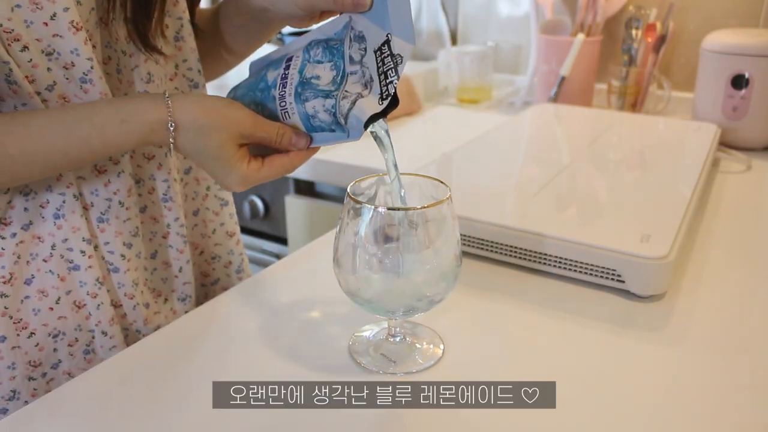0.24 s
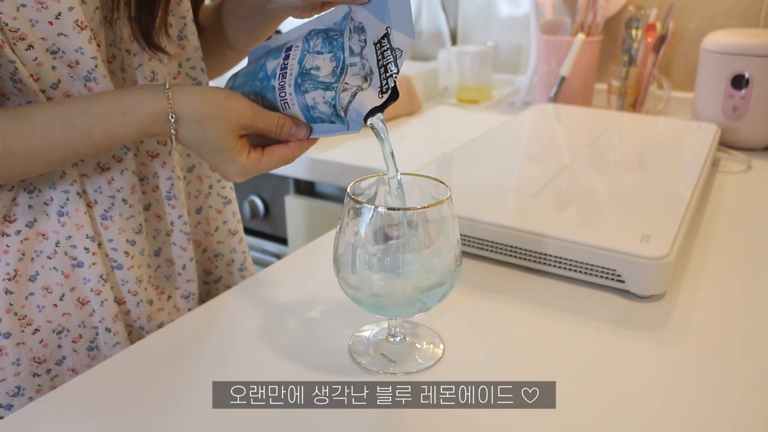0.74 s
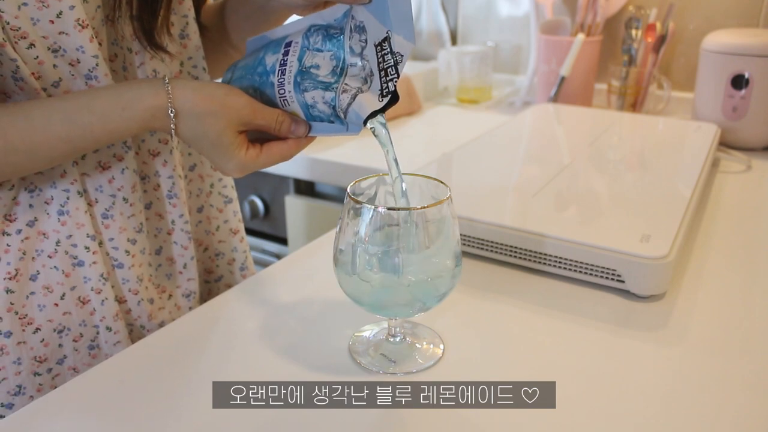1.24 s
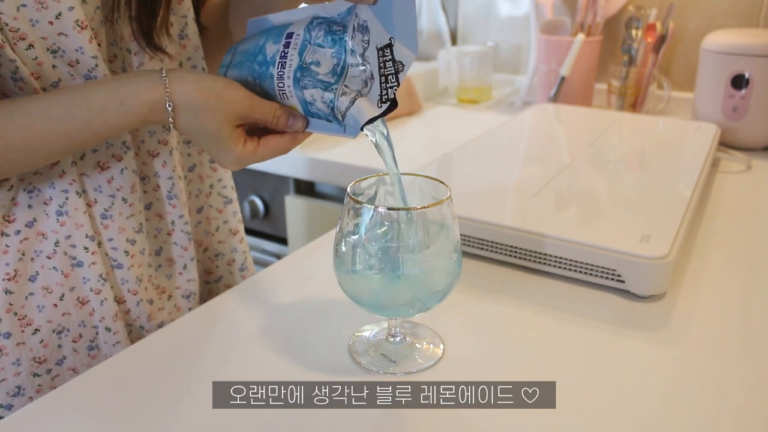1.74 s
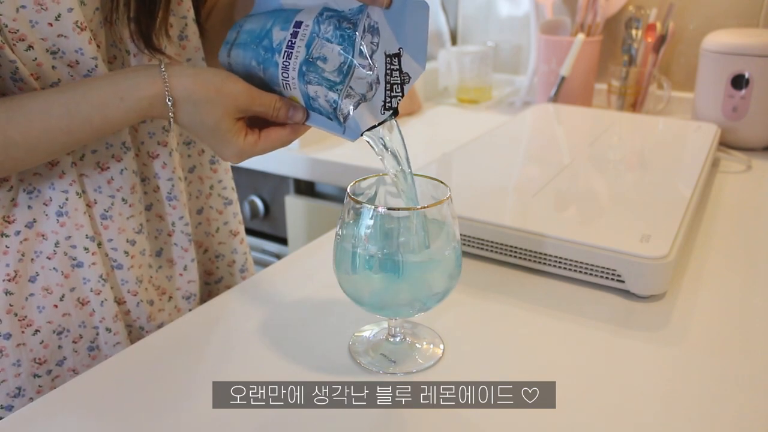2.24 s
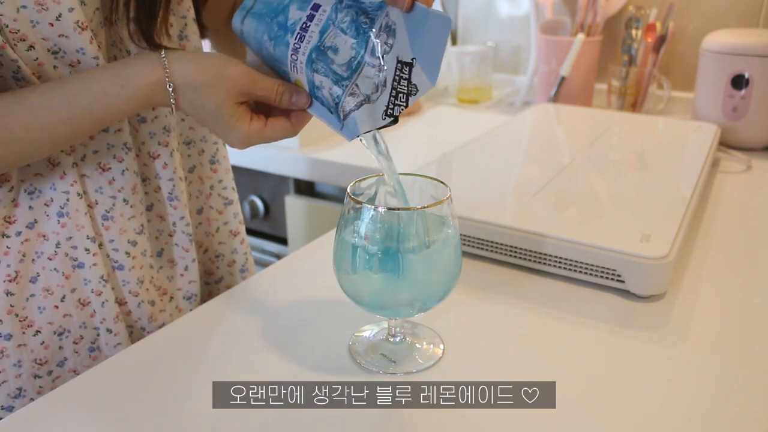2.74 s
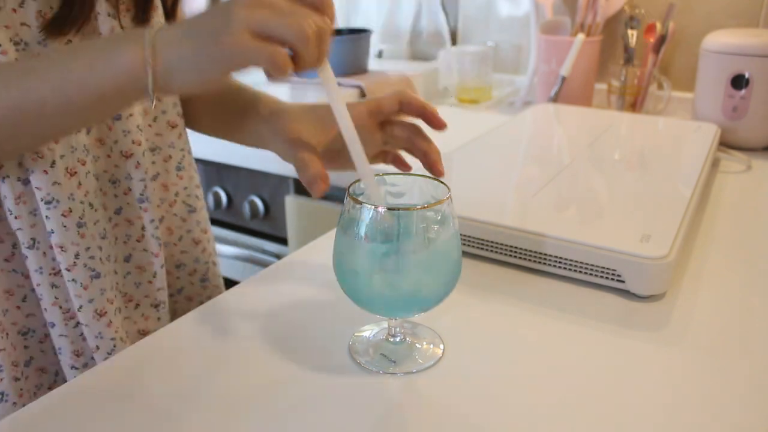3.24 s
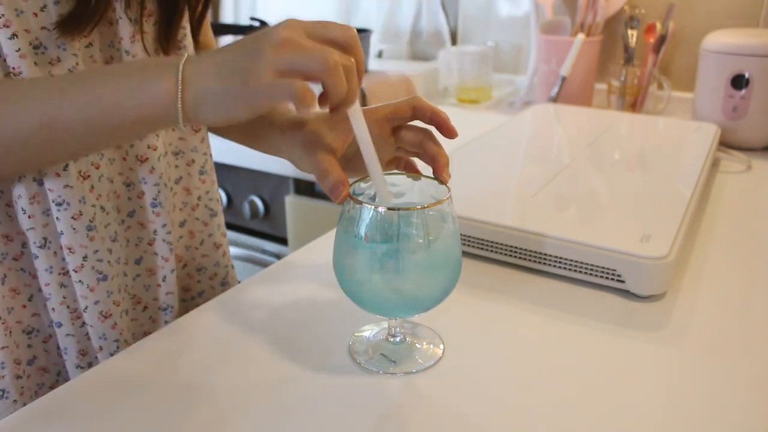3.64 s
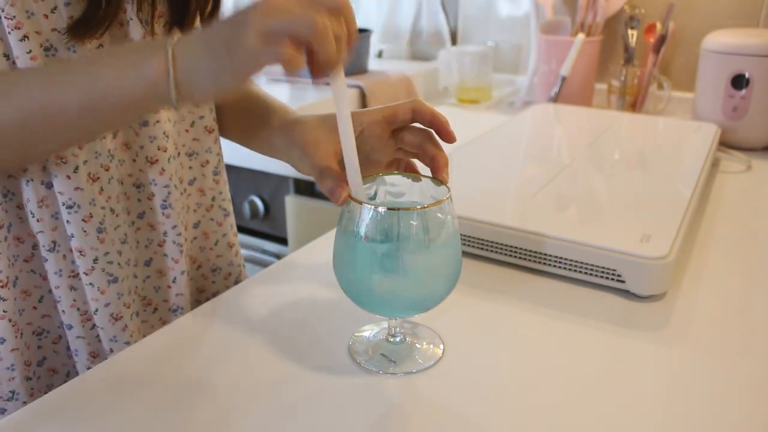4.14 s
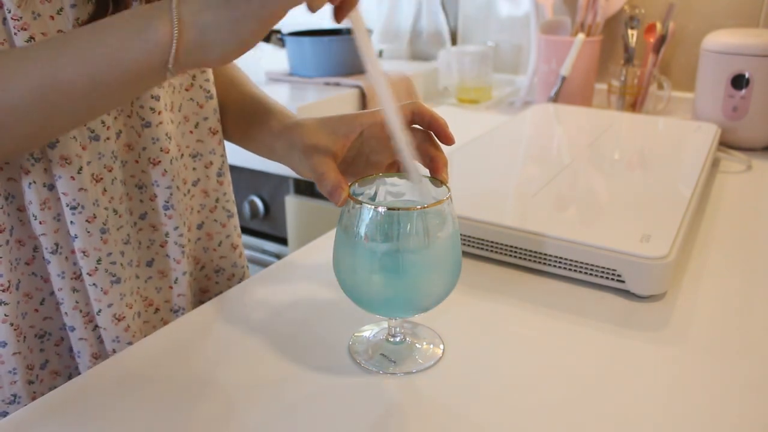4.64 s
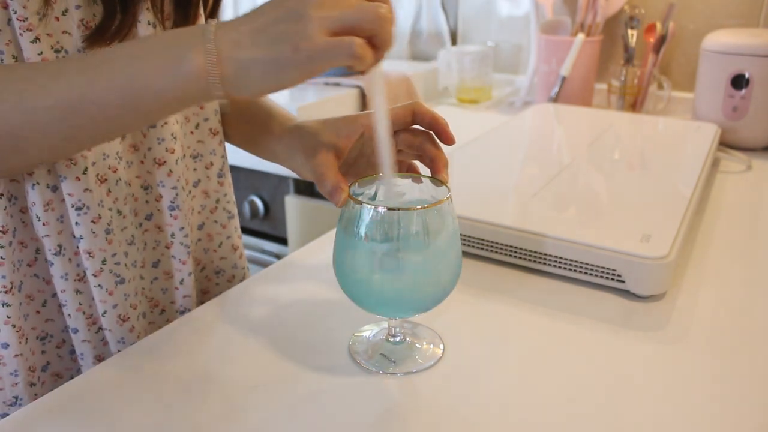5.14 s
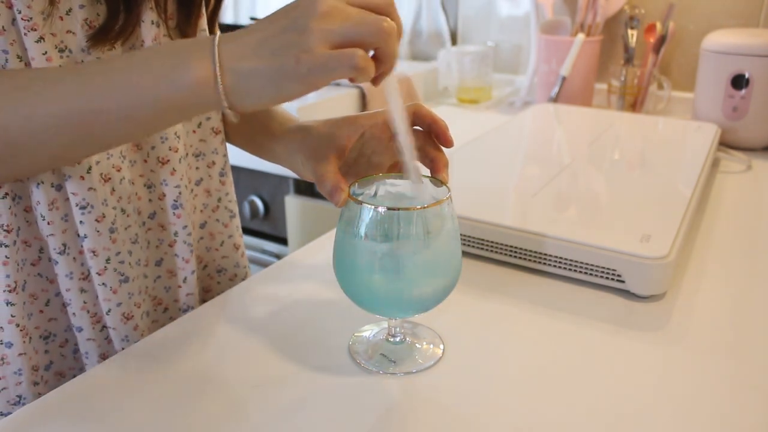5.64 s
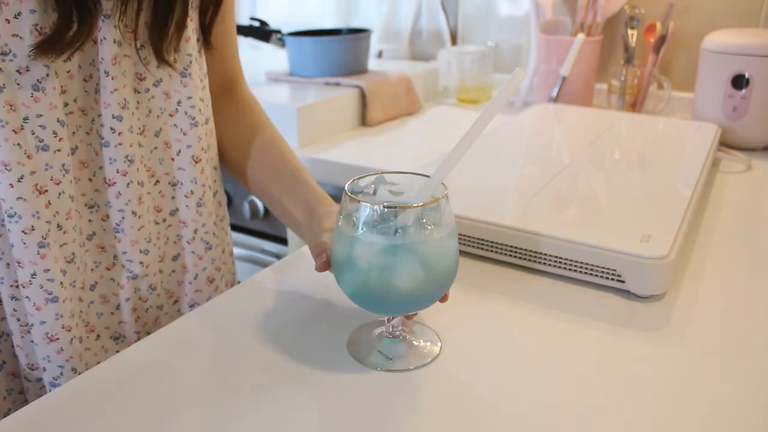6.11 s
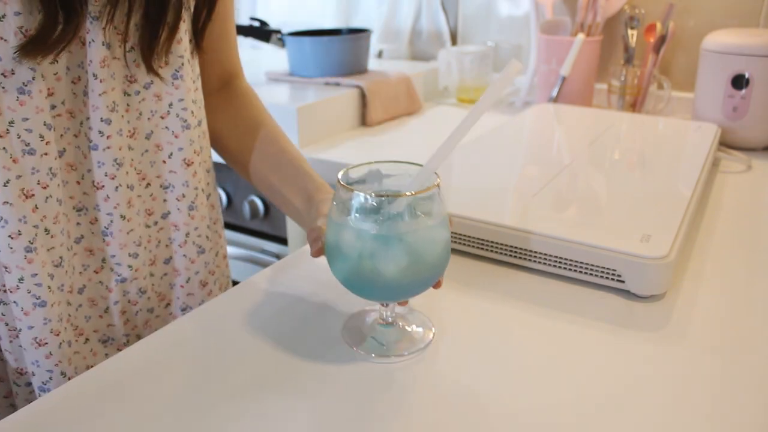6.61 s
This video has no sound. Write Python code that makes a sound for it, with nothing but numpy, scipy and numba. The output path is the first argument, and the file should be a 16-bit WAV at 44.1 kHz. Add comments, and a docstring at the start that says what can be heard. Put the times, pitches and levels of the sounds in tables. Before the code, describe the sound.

Close microphone in a small, hard-walled kitchen with short dense echoes and a very faint appliance hum. From 0 to 3.2 seconds a drink is poured from a pouch over ice in a stemmed glass. The trickle is thin; ice snaps crisply, brightest from about 0.75 to 1.8, with a prominent bubble plink near 0.75. A faint singing ring comes around 1.2 to 1.55, and the air tone climbs as the glass fills. From 2.6 to 3.1 wet slops and hollow glugs end the pour. At 3.3 a straw starts stirring: cubes tick and knock on glass, grind and slush, with soft counter thumps. The strongest, including a wet clop, fall around 4.0 to 4.1 and 4.5; a brighter rattle comes at 5.15, then sparse light ticks. At 6.03 it cuts abruptly to quiet hush, with one barely audible ice crack at 6.3.

```python
"""Iced drink poured and stirred

A cold drink is poured from a pouch over ice in a stemmed glass: ice cracks as filtered clicks and noise bursts,
drops ring the air space ever higher, bubbles are decaying sines and the last slops are bursts of noise.
Then a straw stirs it: random grains through resonances make cubes knock, grind and thud into the counter.
A small hard kitchen answers with dense echoes; an appliance hums faintly, and one late crack follows."""
import sys
import numpy as np
from scipy import signal
from scipy.fft import rfft, irfft
from scipy.io import wavfile
from numba import njit

SR = 44100
rng = np.random.default_rng(int(sys.argv[2]) if len(sys.argv) > 2 else 0)


def master(y):
    """Save y as 16-bit WAV."""
    cut = np.clip(np.atleast_2d(y).T, -1, 1)
    pcm = np.round(cut * 32767)  # scale
    wavfile.write(sys.argv[1], SR, pcm.astype(np.int16))


N = 302967

# Modes of the filled glass. Each row: centre in Hz, width in Hz, strength in dB.
GLASS_MODES = [(1205, 87, 1), (1695, 62, -1), (2383, 100, 1.5), (3056, 55, -2), (3165, 190, 5.5),
               (5140, 60, -5.5), (5906, 94, -0.5), (7070, 480, 7.5)]
# Modes of the counter top. Each row: centre in Hz, width in Hz, strength in dB.
COUNTER_MODES = [(216, 38, -3.5), (262.4, 49, 0), (335, 55, -9), (497, 33, -11)]


def from_db(db):
    """Gain of a level in dB."""
    return 10 ** (np.asarray(db) / 20)


def rms_one(x):
    """Scale to rms 1."""
    return x / np.sqrt(np.mean(x ** 2) + 1e-20)


def in_time(rows):
    """Columns of a curve at every sample, then a gate that is 1 while the curve lasts."""
    s, *columns = np.transpose(rows)
    t = np.arange(N) / SR
    gate = (t >= s[0]) & (t <= s[-1])
    return [np.interp(t, s, c) for c in columns] + [gate]


def held(s, values):
    """Hold each event's value until the next event."""
    latest = np.searchsorted(s, np.arange(N) / SR) - 1
    return values[np.maximum(latest, 0)]


def band(x, low_hz, high_hz):
    """Band-pass between two corners."""
    return signal.sosfilt(signal.butter(2, [low_hz, high_hz], "band", fs=SR, output="sos"), x)


def coloured(x, spectrum):
    """Shape by a spectrum of (Hz, dB) points, joined along log frequency."""
    hz, db = np.transpose(spectrum)
    grid = np.maximum(np.arange(N // 2 + 1) * SR / N, 1)
    gain = from_db(np.interp(np.log(grid), np.log(hz), db))
    return irfft(rfft(x) * gain, N)


def pole_radius(width_hz):
    """Decay per sample of a resonance of this width."""
    return np.exp(-np.pi * width_hz / SR)


def resonate(x, hz, width_hz):
    """Two-pole resonance with nothing at 0 Hz; a unit click rings with height 1."""
    r, w = pole_radius(width_hz), 2 * np.pi * hz / SR
    return signal.lfilter([.5, 0, -.5], [1, -2 * r * np.cos(w), r * r], x + 1e-18)


@njit
def glide(x, hz, r, sr):
    """Two-pole resonance whose centre moves sample by sample."""
    out = np.zeros(len(x))
    for i in range(2, len(x)):
        push = (x[i] - x[i - 2]) / 2
        out[i] = push + 2 * r * np.cos(2 * np.pi * hz[i] / sr) * out[i - 1] - r * r * out[i - 2]
    return out


def clicks(s, db):
    """One sample at each moment."""
    out = np.zeros(N)
    out[np.round(s * SR).astype(int)] = from_db(db)
    return out


def bursts(s, db, rise_s, fade_s):
    """Noise that swells at each moment and dies away."""
    fade = np.exp(-1 / (fade_s * SR))
    shape = signal.lfilter([1], [1, -fade], clicks(s, db) + 1e-18)
    r = np.exp(-1 / (rise_s * SR))
    return signal.lfilter([1 - r], [1, -r], shape) * rng.standard_normal(N)


def grains(per_s, spread_db):
    """Random clicks of uneven size and either sign."""
    luck = rng.uniform(-1, 1, N) * SR / per_s      # under 1 in size marks a click
    hit, out = np.abs(luck) < 1, np.zeros(N)
    rarity = np.minimum(-np.log(np.abs(luck[hit])), 4)      # few clicks are large, none without limit
    out[hit] = np.sign(luck[hit]) * from_db(spread_db * rarity)
    return out


def glass_mode(x, hz, width_hz):
    """The sloshing drink shifts about, so each mode of the glass or its air wanders by a few per cent."""
    knots = rng.standard_normal(N // 2000 + 2)
    wander = 1 + .05 * np.interp(np.arange(N) / 2000, np.arange(len(knots)), knots)
    return glide(x, hz * wander, pole_radius(width_hz), SR)


def air_space(x, width_hz):
    """The air above the drink rings higher as the glass fills; two passes make the resonance steep."""
    # Rising pitch of the air. Each row: time in seconds, pitch in Hz.
    filling = [(0, 926), (1.0, 996), (1.95, 1160), (2.15, 1297), (3.27, 1477)]
    hz, r = in_time(filling)[0], pole_radius(width_hz)
    once = glide(x, hz, r, SR)
    return glide(once, hz, r, SR) * (1 - r * r)


def bubbles(table, cycles, scatter):
    """Each is a lead bubble and three smaller ones near it, decaying sines that rise in pitch as they surface."""
    out, t = np.zeros(N), np.arange(int(.08 * SR)) / SR
    chance = rng.random((len(table), 4, 3)) * [[0], [1], [1], [1]]      # the lead is left exact
    for (s, db, hz), brood in zip(table, chance):
        for late, smaller, off in brood:
            pitch = hz * (1 + scatter * np.sin(2 * np.pi * off))
            swell = np.minimum(t / 0.001, 1) * np.exp(-t * pitch / cycles)
            size = from_db(db - 3.0 - 10 * smaller - 6 * late)
            i = round((s + 0.038 * late) * SR)
            out[i:i + len(t)] += size * swell * np.sin(2 * np.pi * pitch * (t + 1.5 * t * t))
    return out


def blips(per_s, low_hz, high_hz, cycles):
    """Tiny bubbles at random: grains ring resonances over a spread of pitches."""
    pitches = np.geomspace(low_hz, high_hz, num=9)
    return rms_one(sum(resonate(grains(per_s, 5.5), hz, hz / cycles) for hz in pitches))


def background():
    """Room hush as coloured noise, a thin appliance hum as one sine, its fan whine as a narrow band of noise."""
    # Colour of the hush. Each row: frequency in Hz, density in dB per Hz.
    hush_colour = [(20, -14.5), (273, -10), (670, -19), (839, -11), (994, -20.5), (11100, -31.5),
                   (16500, -42)]
    # Appliance tone: frequency in Hz, level in dB rms.
    hum_hz, hum_db = (834.4, -74.5)
    # Breathy fan band: centre in Hz, width in Hz, level in dB rms.
    whine_hz, whine_width_hz, whine_db = (4500, 500, -82)
    hush_db = -70      # rms
    hush = rms_one(coloured(rng.standard_normal(N), hush_colour))
    hum = rms_one(np.sin(2 * np.pi * hum_hz * np.arange(N) / SR))
    whine = rms_one(resonate(rng.standard_normal(N), whine_hz, whine_width_hz))
    return from_db(hush_db) * hush + from_db(hum_db) * hum + from_db(whine_db) * whine


def trickle():
    """Small drops excite the air space and its upper modes, joined by tiny bubbles once the drink is deep."""
    # Strength of the pour. Each row: time in seconds, trickle level in dB, upper trickle level in dB.
    pour_levels = [(0, -89, -67.5), (0.33, -78.5, -70.5), (1.15, -88.5, -77.5), (1.4, -76.5, -71),
                   (1.72, -79.5, -72.5), (1.9, -80.5, -67.5), (2.1, -55.5, -61), (2.35, -84, -73),
                   (2.5, -65, -72.5), (3.0, -60, -60.5), (3.25, -63.5, -100)]
    # Upper modes of the air. Each row: centre in Hz, width in Hz, strength in dB.
    upper_modes = [(2500, 110, -2), (3160, 146, -5.5), (4100, 65, -6), (5360, 90, -5.5)]
    trickle_db, upper_db, on = in_time(pour_levels)
    deep = np.arange(N) > 2.38 * SR
    low = rms_one(air_space(grains(300, 6.4), width_hz=210))
    low += from_db(4.0) * blips(30, 1050, 1900, cycles=18.0) * deep
    upper = rms_one(sum(from_db(g) * glass_mode(grains(25, 4.4), hz, w) for hz, w, g in upper_modes))
    return on * (from_db(trickle_db) * low + from_db(upper_db) * band(upper, 2600, 10000))


def gurgles():
    """Bubbles in the poured drink ring for several cycles, each brood close in pitch."""
    # Each row: start in seconds, level in dB, pitch in Hz.
    gurgle_rows = [(0.035, -45, 2270), (0.755, -19, 2102), (1.3026, -38.5, 1030), (1.5744, -33, 2520),
                   (1.8736, -48, 2680), (1.9376, -32, 1113), (2.0374, -40.5, 1255), (2.2024, -45.5, 2830),
                   (2.4339, -36.5, 1590), (2.4724, -38.5, 1294), (2.752, -40, 3160), (2.956, -24, 3210),
                   (3.0986, -38.5, 1137), (3.1348, -37.5, 3250), (3.2291, -40, 1774)]
    return bubbles(gurgle_rows, cycles=11.2, scatter=0.051)


def cracks():
    """A fracture runs for a few ms; each piece of ice colours its snap, and the air above the drink rings."""
    # Each row: start in seconds, snap level in dB, snap centre in Hz,
    # body and air-space levels in dB relative to the snap.
    crack_rows = [(0.1044, -45, 9800, 4, -19), (0.2024, -38.5, 4800, 17.5, -11.5),
                  (0.292, -62.5, 5000, 18, 4.5), (0.3883, -28, 10200, 11.5, -24),
                  (0.4157, -33.5, 10200, 19.5, -1), (0.5964, -36.5, 8200, 10, -24.5),
                  (0.7617, -18.5, 8900, 4.5, -20.5), (0.823, -19, 4670, -8, -43),
                  (1.003, -15.5, 8300, -37, -30.5), (1.1111, -25, 9400, -8, -27.5),
                  (1.2263, -49, 5070, 13.5, -14), (1.266, -20, 8360, -2, -33),
                  (1.4971, -16.5, 8660, -2, -31.5), (1.5729, -24.5, 6860, -2, -43),
                  (1.7641, -26.5, 7800, -6, -37.5), (1.967, -50, 8650, -5, -31),
                  (2.4062, -37.5, 5570, 0.5, -21), (2.448, -36, 5450, 3, -31), (2.812, -33, 4470, 20, -2),
                  (2.9567, -22, 7240, 3, -24.5), (6.3252, -65, 6000, 14, -9)]
    s, db, hz, body_db, air_db = np.transpose(crack_rows)
    fracture = from_db(1.0) * clicks(s, db) + from_db(-2.5) * bursts(s, db, 0.00044, 0.0044)
    snap = band(fracture, 4600, 21000)
    snap = snap + from_db(-4.0) * glide(snap, held(s, hz), pole_radius(3000), SR)
    short_body = bursts(s, db + body_db, 0.00062, 0.0016)
    long_body = bursts(s, db + body_db - 17.0, 0.0015, 0.015)
    body = band(short_body + long_body, 1800, 3900)
    return snap + body + air_space(bursts(s, db + air_db, 0.0099, 0.0053), width_hz=210)


def glugs():
    """The emptying pouch gulps air: heavily damped bubbles, widely scattered in pitch."""
    # Each row: start in seconds, level in dB, pitch in Hz.
    glug_rows = [(.416, -36, 880), (2.636, -41, 370), (2.817, -12, 896), (2.857, -27.5, 435),
                 (2.935, -26.5, 816), (3.069, -38, 663)]
    return bubbles(glug_rows, cycles=1.68, scatter=0.26)


def singing():
    """The stream keeps one upper mode singing: drops keep striking a narrow resonance."""
    # Centre in Hz, width in Hz, level in dB.
    hz, width_hz, db = (2340, 70, -61)
    # Start and end in seconds.
    start, end = (1.2, 1.56)
    t = np.arange(N) / SR
    tone = rms_one(resonate(resonate(grains(400, 3.0), hz, width_hz), hz, 200))
    return from_db(db) * tone * (t > start) * (t < end)


def splashes():
    """The last of the drink slops onto the ice: a wet slap broad around the air's pitch, with spray on top."""
    # Each row: start in seconds, slap level in dB, bright spray level in dB relative to the slap.
    splash_rows = [(2.611, -24.5, -18.5), (2.701, -29.5, -24), (2.803, -15.5, -40), (2.931, -30, -11.5),
                   (3.0535, -13, -32)]
    s, db, spray_db = np.transpose(splash_rows)
    slap = band(band(bursts(s, db, 0.0013, 0.011), 974, 1660), 710, 5400)
    return slap + band(bursts(s, db + spray_db, 0.00051, 0.0095), 2900, 11000)


def pushes():
    """Levels of grinding, slush, thud and boom: each push swells, holds and settles back into the swirl."""
    # Ice circling between pushes. Each row: time in seconds, then levels in dB of
    # grinding, bright slush, counter thud and deep boom.
    swirl = [(3.29, -71.5, -63, -69, -71), (4.75, -68, -79, -67, -70), (5.05, -66.5, -65, -70.5, -69),
             (6.034, -67, -59, -66, -65.5)]
    # Pushes of the straw. Each row: start in seconds, hold in seconds, then the same four levels in dB.
    strokes = [(3.298, 0.11, -59, -59.5, -55, -54.5), (3.637, 0.061, -62.5, -70, -47.5, -60),
               (3.764, 0.056, -60, -53.5, -56.5, -72), (3.992, 0.11, -49, -68, -44, -50.5),
               (4.252, 0.028, -60, -57, -56, -52.5), (4.423, 0.023, -59, -53, -59, -64),
               (4.475, 0.028, -46, -45, -43, -59), (4.836, 0.09, -66.5, -71, -58, -62.5),
               (5.138, 0.17, -62, -47.5, -62, -58), (5.44, 0.076, -62.5, -54, -73.5, -62.5),
               (5.659, 0.11, -63, -51.5, -59, -76)]
    rise_db_per_s, fall_db_per_s = 503.5, 253.5
    *levels, on = in_time(swirl)
    levels, t = np.array(levels), np.arange(N) / SR
    for s, hold, *db in strokes:
        near = slice(int((s - .15) * SR), int((s + hold + .25) * SR))
        before_s = np.maximum(s - t[near], 0)
        after_s = np.maximum(t[near] - s - hold, 0)
        loss = rise_db_per_s * before_s + fall_db_per_s * after_s
        levels[:, near] = np.maximum(levels[:, near], np.array(db)[:, None] - loss)
    return *levels, on


def stirring():
    """Cubes jostle in short crunches of small slips, and rattle on the glass; their push shakes the counter."""
    # Colour of ice rubbing on ice. Each row: frequency in Hz, density in dB per Hz.
    grind_colour = [(500, 4.5), (1200, 22), (3200, -2), (5000, -18)]
    # Colour of the bright slush. Each row: frequency in Hz, density in dB per Hz.
    slush_colour = [(1200, -16.5), (2300, 0), (5500, 4.5), (8000, -4), (15500, -19.5)]
    boom_hz, boom_width_hz = 145.7, 28      # lowest mode of the cabinet under the counter
    grind_db, slush_db, thud_db, boom_db, on = pushes()
    jostle = signal.lfilter([1], [1, -np.exp(-1 / (.006 * SR))], np.abs(grains(110, 2.5)))
    jostle = .3 + rms_one(jostle)      # crunches over a steady floor
    rub = rms_one(coloured(jostle * grains(4400, 2.0), grind_colour))
    slush = rms_one(coloured((0.65 + jostle) * grains(5000, 3.2), slush_colour))
    rattle = rms_one(sum(from_db(g) * glass_mode(jostle * grains(250, 3.0), hz, 2.6 * w)
                         for hz, w, g in GLASS_MODES))
    shaken = sum(from_db(g) * resonate(grains(130, 4.9), hz, w) for hz, w, g in COUNTER_MODES)
    thud = rms_one(band(shaken, 130, 1100))
    boom = rms_one(band(resonate(grains(100, 2.0), boom_hz, boom_width_hz), 130, 187))
    grinding = from_db(grind_db) * (rub + from_db(6.5) * rattle)
    wet_ice = from_db(slush_db) * (slush + from_db(-7.0) * rattle)
    counter = from_db(thud_db) * thud + from_db(boom_db) * boom
    return on * (grinding + wet_ice + counter)


def knocks():
    """A cube ticks and crunches around the pitch its spot favours, ringing the glass modes nearby."""
    # Ice on glass. Each row: start in seconds, level in dB, favoured pitch in Hz.
    knock_rows = [(3.296, -29, 3130), (3.342, -29, 2000), (3.372, -33.5, 2060), (3.47, -27.5, 2500),
                  (3.626, -25.5, 3140), (3.69, -27.5, 1670), (3.71, -34, 1700), (3.732, -30.5, 4030),
                  (3.762, -37.5, 2400), (3.799, -30, 2620), (3.951, -37, 3130), (4.002, -26, 3300),
                  (4.01, -26, 1730), (4.027, -22, 1680), (4.084, -19, 1720), (4.255, -30.5, 3560),
                  (4.401, -39, 1640), (4.45, -30, 2950), (4.499, -24, 2800), (4.535, -28.5, 6100),
                  (4.663, -41.5, 1570), (4.826, -44, 3000), (4.888, -41, 2400), (5.009, -41, 3130),
                  (5.078, -44, 4200), (5.093, -37.5, 3120), (5.133, -28.5, 2430), (5.148, -27, 3000),
                  (5.176, -21, 3760), (5.206, -27.5, 3100), (5.237, -26, 3100), (5.268, -30, 5900),
                  (5.387, -46, 3120), (5.44, -34, 5100), (5.452, -41, 3220), (5.659, -38.5, 5900),
                  (5.687, -43, 5100), (5.75, -41.5, 3100), (5.956, -37, 3100), (6.014, -37, 3100)]
    s, db, favoured_hz = np.transpose(knock_rows)
    chance_db = rng.normal(0, 3, (len(s), len(GLASS_MODES)))
    crunch = clicks(s, db) + bursts(s, db - 13.0, 0.0004, 0.007)
    out = from_db(-6.5) * glide(crunch, held(s, favoured_hz), pole_radius(1300), SR)
    out += from_db(-1.5) * band(crunch, 1400, 10000)
    for (hz, w, g), luck_db in zip(GLASS_MODES, chance_db.T):
        away_db = -15 * np.abs(np.log2(hz / favoured_hz))      # distant modes ring less
        strike = bursts(s, db + g - 20.0 + away_db + luck_db, 0.00023, 0.0017)
        out += glass_mode(strike, hz, w)
    return out


def thumps():
    """The glass rocks on its foot: a soft push of a few ms rings the counter top."""
    # Each row: start in seconds, push level in dB.
    thump_rows = [(3.652, -43), (3.713, -46), (3.803, -51.5), (3.976, -46), (4.088, -42.5), (4.497, -42.5)]
    push = band(clicks(*np.transpose(thump_rows)), 120, 376)
    ring = sum(from_db(g) * resonate(push, hz, w) for hz, w, g in COUNTER_MODES)
    return 13.7 * ring / len(COUNTER_MODES)


def clops():
    """Wet clops among the stirred cubes: bubbles that ring for many cycles."""
    # Each row: start in seconds, level in dB, pitch in Hz.
    clop_rows = [(4.0586, -22.5, 1720), (4.3268, -41.5, 1720), (4.41, -33, 1730)]
    return bubbles(clop_rows, cycles=15.0, scatter=0.13)


def kitchen(x, wet_db):
    """Dense echoes of hard walls, dying band by band; random patterns in turn let no metallic colour build up."""
    # Decay of the room. Each row: band centre in Hz, time to fall 60 dB in seconds.
    decays = [(250, 0.16), (1200, 0.15), (4000, 0.18), (11000, 0.19)]
    t, step = np.arange(SR // 3) / SR, SR // 8      # the next pattern every eighth of a second
    noise = rng.standard_normal((len(decays), 9, len(t)))      # nine patterns, taken in turn
    tails = sum(band(n, hz / 1.76, hz * 1.9) * from_db(-60 * t / t60)
                for n, (hz, t60) in zip(noise, decays))
    tails *= np.minimum(t / 0.0035, 1)      # the first walls are a metre or two away
    wet = np.zeros(N + step + len(t))
    for k, i in enumerate(range(0, N, step)):
        tail = rms_one(tails[k % len(tails)]) / np.sqrt(len(t))
        echo = signal.fftconvolve(x[i:i + step], tail)
        wet[i:i + len(echo)] += echo
    return x + from_db(wet_db) * wet[:N]


def scene():
    """Pouring, then stirring, each with its share of the room, over the background."""
    liquid = trickle() + gurgles() + glugs() + singing() + splashes()
    pour = kitchen(cracks() + liquid, wet_db=-3.0)
    stir = kitchen(stirring() + knocks() + thumps() + clops(), wet_db=-7.5)
    stir *= np.arange(N) < 6.034 * SR      # the stirring is cut off abruptly, echoes included
    return (pour + stir + background())[None]


def record(dry):
    """A steep low-pass cuts the top, 60 dB down from 16.8 kHz."""
    return signal.sosfilt(signal.cheby2(12, 60, 16800, fs=SR, output="sos"), dry)


dry = scene()
out = record(dry)
master(out)
```